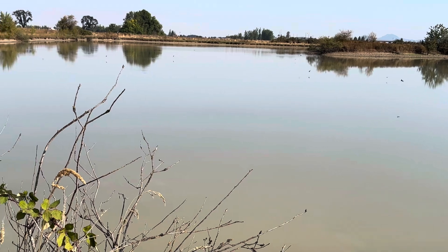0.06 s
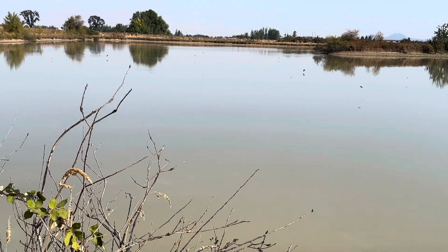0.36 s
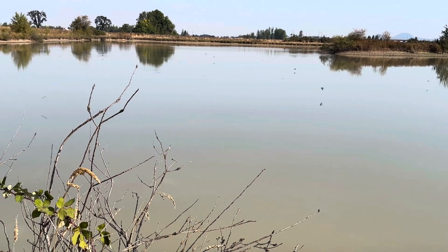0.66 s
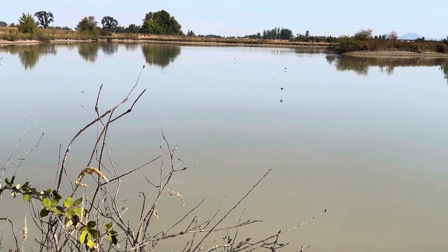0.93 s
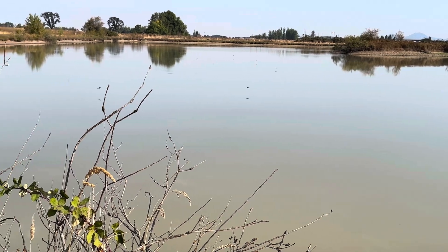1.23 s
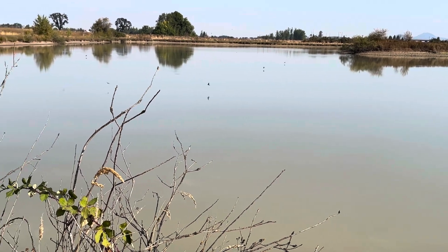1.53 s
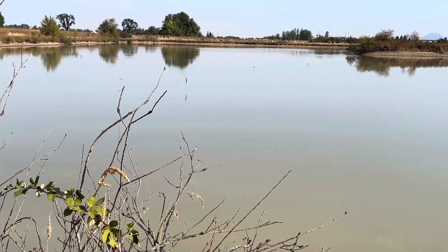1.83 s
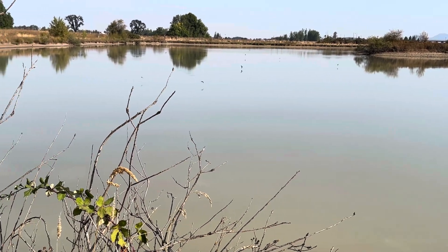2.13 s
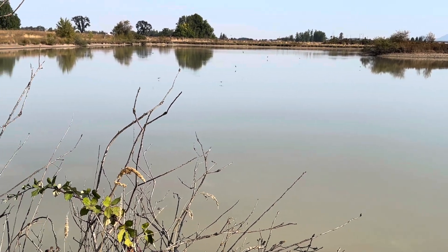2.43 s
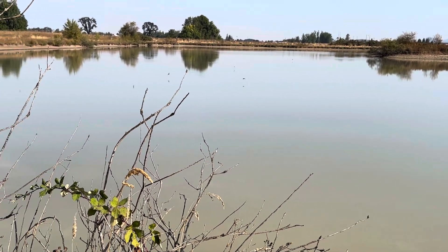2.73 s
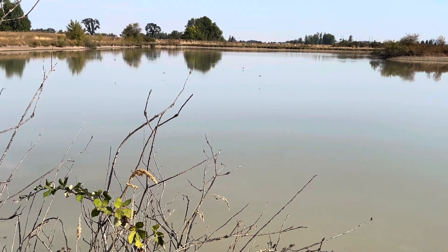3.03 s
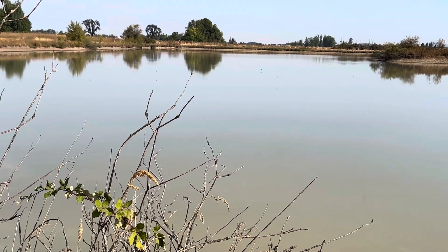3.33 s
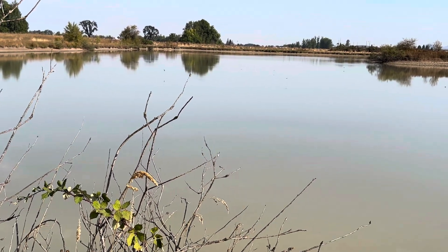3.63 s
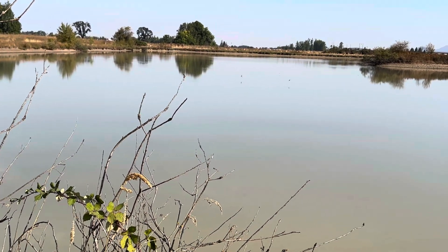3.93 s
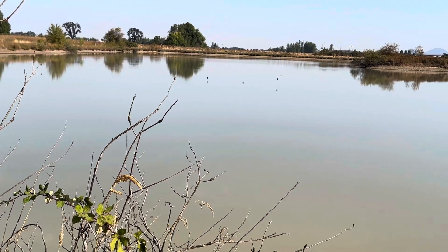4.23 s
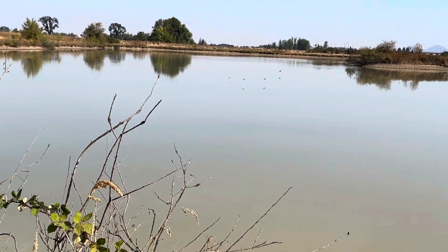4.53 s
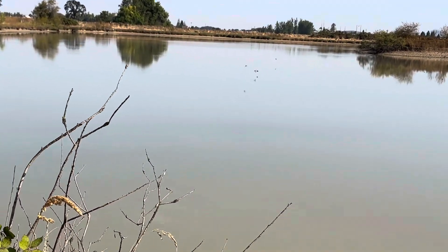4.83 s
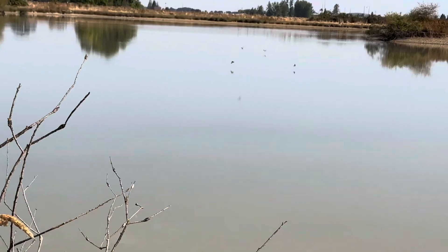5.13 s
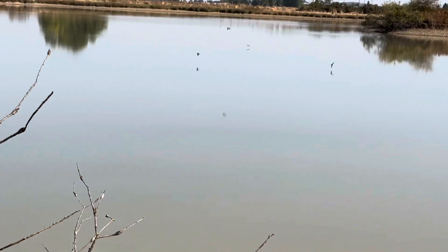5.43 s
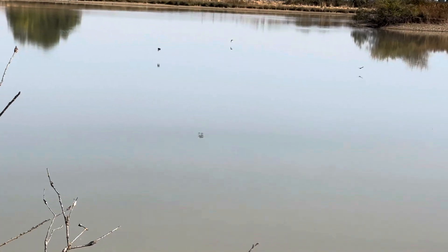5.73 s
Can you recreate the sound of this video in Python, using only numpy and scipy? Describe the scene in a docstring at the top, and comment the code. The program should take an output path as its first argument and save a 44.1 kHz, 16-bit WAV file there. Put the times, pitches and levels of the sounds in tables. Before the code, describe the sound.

Low wind rumbles and bumps the microphone while small birds call outdoors with quick high pips and thin, sliding whistles.

```python
"""Small birds call across a pond: one pips about ten times a second, others slur high, wavering
whistles over it. Each note is a gliding three-partial tone roughened by flutter; the banks echo the
calls and reeds smear them. Below lie wind rumble, a drone, a faint hum and a distant hush of shaped
noise; eddies thump the microphone. One sharp tick and one short rasp sound close by."""
import sys
import numpy as np
from scipy import signal
from scipy.fft import rfft, irfft, next_fast_len
from scipy.io import wavfile
from scipy.ndimage import uniform_filter1d, map_coordinates

SR = 44100
rng = np.random.default_rng(int(sys.argv[2]) if len(sys.argv) > 2 else 0)


def wav_record(signal):
    """Record a signal, one row per channel, as 16-bit PCM in the file named by sys.argv[1]."""
    frames = np.transpose(np.atleast_2d(signal))
    bounded = np.clip(frames, -1, 1)
    # unit amplitude maps onto the largest positive 16-bit level
    quanta = np.round(bounded * 32767).astype(np.int16)
    wavfile.write(sys.argv[1], SR, quanta)


N = 258867

# Air level contours: t/s, rumble/dB, hush/dB
AIR_LEVELS = [(0.0, -41.5, -61.5), (0.65, -45, -61), (1.99, -47.5, -62), (4.5, -47, -62.5),
              (4.87, -48.5, -62), (5.23, -47, -61.5), (5.66, -52, -61.5), (5.87, -43, -60)]
# Eddies at the microphone: peak t/s, half width/s, f/Hz, push/dB, buffet/dB
EDDIES = [(0.037, 0.028, 60.67, -31.5, -76), (0.448, 0.0086, 80, -29, -72),
          (0.518, 0.0083, 80.2, -34.5, -66), (0.832, 0.019, 90.9, -35.5, -74), (0.898, 0.019, 62, -29, -67),
          (1.027, 0.013, 82.4, -36, -71), (4.53, 0.023, 87.9, -29.5, -49.5),
          (5.171, 0.0084, 75.6, -20, -42), (5.297, 0.012, 86.6, -27.5, -52),
          (5.362, 0.02, 106.3, -31.5, -48.5), (5.429, 0.019, 63.5, -27, -55),
          (5.704, 0.0083, 69.4, -37, -54.5), (5.774, 0.02, 65, -36.5, -46),
          (5.81, 0.0094, 85.9, -32.5, -58), (5.86, 0.019, 69.7, -32.5, -47)]
# Noise spectra: f/Hz, relative density/dB
RUMBLE_SPECTRUM = [(13, -40), (22, -19.5), (48, -1), (98, 0), (111, -4), (129, -7.5), (146, -8.5),
                   (243, -28.5), (400, -44.5), (520, -58.5), (880, -120)]
BUFFET_SPECTRUM = [(40, -24), (100, -5.5), (180, 8.5), (280, -3.5), (400, -18.5), (700, -61), (1500, -120)]
HUSH_SPECTRUM = [(120, -19), (280, 2), (500, 1.5), (575, 4.5), (660, 3.5), (1050, 1), (1400, -6.5),
                 (1900, -13), (2600, -19), (4000, -24), (5200, -34.5), (7200, -36), (9000, -38.5),
                 (14000, -50)]
HAZE_SPECTRUM = [(2000, -30), (3200, -6), (4000, -1), (5000, -10), (6200, -4.5), (7500, -25)]
RASP_SPECTRUM = [(2000, -64), (4500, -6), (5700, -6), (6500, 3.5), (7400, 0), (8800, -18), (12000, -41)]
# Left-right likeness of the noise: f/Hz, coherence/1
COHERENCE = [(50, 0.96), (150, 0.95), (280, 0.89), (500, 0.83), (1000, 0.56), (2000, 1), (4000, 0.94),
             (9000, 0.21)]
# Left-right phase offset of the noise: f/Hz, left phase lead/rad
LEFT_LEAD = [(200, 0), (340, -0.17), (560, -1.46), (780, -1.8), (1290, -1.62), (2000, -0.22)]
# Far sinking notes: t/s, length/s, mid f/Hz, level/dB
ANSWER_NOTES = [(.005, 0.028, 3730, -66), (0.042, .032, 3720, -72), (0.236, .035, 3490, -76),
                (0.347, .045, 3650, -75), (1.362, 0.019, 3640, -61.5), (1.59, 0.028, 3610, -69),
                (2.185, 0.024, 3520, -74), (2.3, 0.038, 3700, -69), (2.543, 0.033, 3420, -69),
                (2.562, 0.046, 3690, -70.5), (2.634, .03, 3370, -72), (2.743, .03, 3480, -73),
                (2.906, 0.046, 3470, -73.5), (3.071, 0.044, 3510, -74), (3.146, 0.083, 3590, -74),
                (3.233, 0.031, 3440, -72), (3.569, 0.048, 3875, -68), (3.969, 0.035, 3880, -70),
                (3.993, .025, 3430, -71), (4.007, .06, 3700, -77), (4.141, 0.02, 3970, -66),
                (4.131, 0.043, 3370, -75), (4.24, 0.036, 3680, -69), (4.295, 0.039, 3360, -73),
                (4.624, 0.045, 3510, -75), (4.777, 0.035, 3650, -71), (4.825, 0.044, 3580, -74.5),
                (4.913, .026, 3280, -72), (5.064, 0.046, 3550, -72), (5.097, 0.04, 3440, -73.5),
                (5.308, 0.08, 3500, -73.5), (5.399, 0.034, 3670, -74), (5.475, 0.035, 3400, -73),
                (5.502, 0.059, 3520, -70), (5.572, 0.038, 3350, -72), (5.69, 0.042, 3810, -71),
                (5.692, .04, 3530, -72.5), (5.711, 0.045, 3430, -70)]
# Pips in four runs: t/s, length/s, f/Hz, level/dB
PIP_NOTES = [(0.036, 0.021, 3825, -57.5), (0.124, 0.029, 3795, -61.5), (0.209, 0.024, 3780, -60),
             (0.299, 0.017, 3805, -56.5), (0.388, 0.024, 3790, -60), (0.479, 0.028, 3760, -61),
             (0.566, 0.027, 3780, -60), (1.076, 0.03, 3840, -59), (1.287, 0.021, 3870, -59),
             (1.374, 0.033, 3890, -59.5), (1.467, 0.03, 3865, -58.5), (1.567, 0.029, 3955, -55),
             (1.663, 0.04, 3940, -59.5), (1.762, 0.03, 3870, -58.5), (1.857, 0.027, 3830, -63),
             (1.95, 0.022, 3890, -59), (2.041, 0.028, 3900, -62.5), (2.13, 0.038, 3907, -62),
             (2.227, 0.026, 3950, -61.5), (2.325, 0.031, 3880, -62), (2.422, 0.016, 3823, -56.5),
             (2.519, 0.025, 3920, -63.5), (2.613, 0.036, 3960, -61), (3.214, 0.03, 3870, -60),
             (3.302, 0.028, 3790, -64), (3.393, 0.021, 3690, -67), (3.482, 0.027, 3800, -62),
             (3.571, 0.023, 3770, -67), (3.663, 0.024, 3800, -60.5), (3.749, 0.031, 3804, -62.5),
             (3.838, 0.025, 3840, -62.5), (3.932, 0.023, 3840, -62.0), (4.026, 0.021, 3820, -60.5),
             (4.115, 0.033, 3840, -59.5), (4.615, 0.023, 3835, -61.5), (4.724, 0.016, 3860, -60),
             (4.82, 0.029, 3907, -58.5), (4.911, 0.027, 3880, -58), (5.005, 0.028, 3910, -56.5),
             (5.093, 0.034, 3890, -59.5), (5.188, 0.024, 3875, -56.5), (5.282, 0.03, 3890, -57),
             (5.377, 0.02, 3860, -58.5), (5.464, 0.018, 3855, -60.5), (5.553, 0.021, 3830, -63),
             (5.642, 0.021, 3850, -61.5), (5.729, 0.021, 3820, -61.5), (5.821, 0.022, 3800, -62)]
# Slurs: t/s, length/s, nominal crest f/Hz, knee f/Hz, mid-tail f/Hz, end f/Hz, crest/dB, tail/dB
SLUR_NOTES = [(.086, .135, 4250, 3800, 3610, 3520, -64.5, -68),
              (0.423, .44, 4530, 3810, 4120, 3960, -62.5, -65.5),
              (0.488, .16, 4850, 4390, 4340, 4240, -70, -72),
              (0.629, .145, 4290, 3820, 3650, 3570, -62, -65.5),
              (1.121, 0.12, 4850, 4470, 4390, 4370, -72, -68),
              (1.159, .15, 4300, 3780, 3610, 3580, -58.5, -66),
              (1.515, .27, 4450, 3966, 4046, 3794, -64, -65),
              (1.858, .155, 4350, 3800, 3670, 3540, -59.5, -64.5),
              (2.382, .14, 4350, 3810, 3660, 3560, -62, -66),
              (2.983, .145, 4300, 3760, 3600, 3480, -63.5, -67.5),
              (3.28, .4, 4540, 3870, 4185, 3970, -69, -65), (5.087, .31, 4740, 3984, 4154, 3910, -62, -66)]
# Arched chirps: t/s, length/s, mid f/Hz, glide/share of f, level/dB
CHIRP_NOTES = [(.37, .055, 4300, .035, -78), (0.885, 0.042, 4160, -0.097, -66),
               (1.33, 0.045, 5310, 0.15, -71.5), (2.273, .085, 4330, .03, -79),
               (2.773, 0.045, 4380, -0.028, -75.5), (2.938, .05, 4370, 0.043, -78),
               (3.059, 0.036, 4980, -0.068, -77), (3.156, .028, 5080, -0.01, -77),
               (3.109, 0.035, 3950, 0.053, -61), (3.292, 0.058, 7100, 0.085, -74),
               (3.298, 0.069, 5440, 0.12, -74), (3.837, 0.16, 4240, -0.081, -71),
               (5.436, 0.088, 8840, -0.17, -80), (5.459, 0.054, 7740, -0.0012, -74),
               (5.831, 0.043, 3980, -0.1, -65)]
# Nearest bird's call, one point list per note: delay/s, f/Hz, relative level/dB
PHRASE_SHAPE = [
    [(0, 3914, -2), (.02, 3970, 2), (.046, 4290, 0), (.06, 4240, -6), (.072, 4060, -4.5)],
    [(.103, 4120, 0), (.118, 4320, 2), (.136, 4240, -5.5), (.146, 4220, -8.5), (.16, 4250, 0),
     (.19, 4176, 2.5), (.208, 4010, -2), (.224, 3820, -9)],
]
# Repeats of that call: t/s, level/dB
PHRASE_CALLS = [(.656, -57), (2.713, -59.5), (4.217, -59)]
# Falling chips: t/s, length/s, start f/Hz, fall/share of f, level/dB, relative overtone/dB
CHIP_NOTES = [(1.013, 0.048, 3050, 0.13, -75, -7.5), (1.154, 0.036, 3370, 0.33, -72.5, -20),
              (1.316, 0.029, 3370, 0.36, -72.5, -16), (1.8, 0.049, 3100, 0.22, -76.5, -7),
              (2.102, 0.05, 3050, 0.29, -76, -18), (2.217, 0.073, 2630, 0.3, -83, 4),
              (5.044, 0.022, 3100, 0.11, -77, -19), (5.092, 0.033, 2400, 0.056, -73.5, -26.5),
              (5.142, 0.027, 3220, 0.09, -70, -16)]
# Shore echo decay: f/Hz, t60/s
SHORE_T60 = [(500, .16), (4000, .18), (10000, .05)]


def amp(db):
    """Decibels to gain."""
    return 10 ** (np.asarray(db) / 20)


def unit(x):
    """Scale to rms 1."""
    return x / np.sqrt(np.mean(x ** 2) + 1e-20)


def clock(length_s):
    """Sample times in s."""
    return np.arange(int(length_s * SR)) / SR


def along(points, hz):
    """Read (f/Hz, value) points on a log axis."""
    f, values = np.transpose(points)
    return np.interp(np.log(hz + 1), np.log(f + 1), values)


def glide(t, times, values):
    """Path through points, corners rounded."""
    return uniform_filter1d(np.interp(t, times, values), size=400, mode="nearest")


def wobble(rate_hz, size=N):
    """Smooth random curve with knots at rate_hz."""
    knots = rng.standard_normal(int(size * rate_hz / SR) + 4)
    return map_coordinates(knots, [np.arange(size) * rate_hz / SR])


def filtered(x, response):
    """Apply a frequency response."""
    size = next_fast_len(N + SR // 2)
    return irfft(rfft(x, size) * response(np.fft.rfftfreq(size, 1 / SR)), size)[..., :N]


def add(track, start_s, sound):
    """Mix a sound into a track."""
    part = track[max(round(start_s * SR), 0):][:len(sound)]
    part += sound[:len(part)]


def from_the_side(x, lead_us=20, pan_db=0.15):
    """Off-axis sound reaches the left port earlier and louder."""
    sides = np.array([[1], [-1]])
    return amp(pan_db * sides) * filtered(x, lambda hz: np.exp(1j * np.pi * hz * sides * lead_us / 1e6))


def rush(spectrum, patchy_db):
    """Partly coherent stereo noise, rms 1, with drifting patches of gain."""
    def mid_side_gains(hz):
        angle = np.arccos(np.clip(along(COHERENCE, hz), -1, 1)) / 2
        return amp(along(spectrum, hz)) * [np.cos(angle), np.sin(angle)]

    bins = signal.stft(rng.standard_normal((2, N)), nperseg=512)[2]
    patches = uniform_filter1d(rng.standard_normal(bins.shape[1:]), size=5, axis=0)
    patches = unit(uniform_filter1d(patches, size=16, axis=1))
    pair = signal.istft(bins * amp(patchy_db * patches), nperseg=512)[1][:, :N]
    mid, side = filtered(pair, mid_side_gains)
    stereo = np.array([mid + side, mid - side])
    return unit(filtered(stereo, lambda hz: np.exp(.5j * along(LEFT_LEAD, hz) * [[1], [-1]])))


def note(t, hz, attack_s, release_s, waver, under_db, over_db, rough, flutter_db=2.15):
    """Bird tone: the throat favours partial 2, at hz; under_db and over_db set partials 1 and 3."""
    jitter, flutter, grain = (wobble(rate_hz, SR // 2)[:len(t)] for rate_hz in (250, 130, 1500))
    phase = np.pi * np.cumsum(hz * (1 + waver * jitter)) / SR
    onset = np.sin(np.pi / 2 * np.clip(t / attack_s, 0, 1))
    fade = np.sin(np.pi / 2 * np.clip((t[-1] - t) / release_s, 0, 1)) ** 2
    tone = np.sin(2 * phase) + amp(under_db) * np.sin(phase) + amp(over_db) * np.sin(3 * phase)
    return onset * fade * amp(flutter_db * flutter) * (1 + rough * grain) * tone


def air(drone_hz=99, hum_hz=565, hum_width_hz=32, buffet_lead_s=.0021, buffet_spread=1.49):
    """Wind rumble, buffeting that leads and outlasts each puff, far drone and hum, open-land hush."""
    t = np.arange(N) / SR
    times, *levels = np.transpose(AIR_LEVELS)
    rumble_db, hush_db = (np.interp(t, times, level) for level in levels)
    flares = sum(amp(db) * np.exp(-((t + buffet_lead_s - peak_s) / (buffet_spread * width_s)) ** 2)
                 for peak_s, width_s, _, _, db in EDDIES)
    rumble = amp(rumble_db + 0.57 + 0.97 * wobble(6.5)) * rush(RUMBLE_SPECTRUM, patchy_db=1)
    buffet = (amp(rumble_db - 18) + flares) * amp(1.8 * wobble(25)) * rush(BUFFET_SPECTRUM, patchy_db=2.5)
    hush = amp(hush_db + 3) * rush(HUSH_SPECTRUM, patchy_db=0.87)
    drone_gain = amp(-48.5 + 0.64 * wobble(7.4))
    drone = drone_gain * np.sin(2 * np.pi * np.cumsum(drone_hz + 2.54 * wobble(14)) / SR)
    hum = filtered(rng.standard_normal(N), lambda hz: np.exp(-((hz - hum_hz) / hum_width_hz) ** 2))
    return from_the_side(rumble + drone + amp(-72) * unit(hum), lead_us=23, pan_db=0.52) + buffet + hush


def puffs(port_skew_rad=0.2, slowing=0.3867):
    """Each eddy pushes the microphone for a few slowing cycles, the two ports slightly out of step."""
    out, t = np.zeros((2, N)), np.arange(N) / SR
    for peak_s, width_s, hz, db, _ in EDDIES:
        u = np.arange(-7 * width_s, 7 * width_s, 1 / SR) / width_s
        phase = 2 * np.pi * (np.cumsum(hz * (1 - slowing * np.tanh(u))) / SR + rng.random())
        for port, skew in zip(out, port_skew_rad * rng.standard_normal(2)):
            push = amp(db) * np.sin(phase + skew) / np.cosh(1.27 * u)
            port += np.interp(t, peak_s + u * width_s, push, left=0, right=0)
    return out


def answers(sink_per_s=.7):
    """The flock answers from farther off: thin, lower, steadily sinking notes."""
    out = np.zeros(N)
    for start_s, length_s, hz, db in ANSWER_NOTES:
        t = clock(length_s)
        pitch_hz = hz * (1 - sink_per_s * (t - length_s / 2))
        tone = note(t, pitch_hz, attack_s=.008, release_s=.014, waver=.008,
                    under_db=-15, over_db=-30, rough=.18)
        add(out, start_s, amp(db) * tone)
    return out


def shore_echo(calls):
    """The banks scatter the calls into a thin tail that changes as the birds move."""
    out, t = np.zeros((2, N)), np.arange(N) / SR
    centres_s, step_s = np.linspace(0, N / SR, num=12, retstep=True)
    for centre_s in centres_s:
        hz, age_s, bins = signal.stft(rng.standard_normal((2, SR // 3)), SR, nperseg=256)
        decay = amp(-60 * age_s / along(SHORE_T60, hz)[:, None])
        tail = signal.istft(bins * decay, SR, nperseg=256)[1]
        crossfade = np.clip(1 - abs(t - centre_s) / step_s, 0, 1)
        out += signal.oaconvolve((calls * crossfade)[None], tail / np.linalg.norm(tail[0]), axes=1)[:, :N]
    return out


def haze(calls, db=-24, lag_s=.028):
    """Reeds and twigs smear a faint, grainy halo that trails the calls."""
    envelope = np.sqrt(np.abs(uniform_filter1d(calls ** 2, size=2600)))
    lagged = np.interp(np.arange(N) - lag_s * SR, np.arange(N), envelope)
    return amp(db) * lagged * rush(HAZE_SPECTRUM, patchy_db=7)


def pips(arch=.004, tilt=.004, trail_s=.0053):
    """Short pips, each with a slight random arch and tilt in pitch."""
    out = np.zeros(N)
    for start_s, length_s, hz, db in PIP_NOTES:
        t = clock(length_s + trail_s)
        bow = arch * (1 + rng.standard_normal() / 2)
        rise = tilt * rng.standard_normal()
        pitch_hz = hz * glide(t, [0, t[-1] / 2, t[-1]], [1 - bow - rise, 1 + bow / 2, 1 - bow + rise])
        tone = note(t, pitch_hz, attack_s=.0023, release_s=.019, waver=.0032,
                    under_db=-14.5, over_db=-31, rough=.038, flutter_db=1.5)
        add(out, start_s - .001, amp(db) * tone)
    return out


def bank_slap(calls, delay_s=.031, db=-17.5):
    """The near bank returns each call once."""
    return amp(db) * filtered(calls, lambda hz: np.exp(-2j * np.pi * hz * delay_s))


def far_twitter(count=44, low_hz=3400, range_hz=2500, base_db=-85, fall=.07, high_loss_db=7):
    """Faint, hoarse falling notes from the far water; higher ones carry less well."""
    out = np.zeros(N)
    for slot, (offset, span, height, loudness) in enumerate(rng.random((count, 4))):
        t = clock(.033 + .05 * span)
        pitch_hz = (low_hz + range_hz * height) * (1 - fall * t / t[-1])
        level_db = base_db + 5 * loudness - high_loss_db * height
        tone = note(t, pitch_hz, attack_s=.008, release_s=.012, waver=.025,
                    under_db=-12.5, over_db=-28, rough=1)
        add(out, (slot + offset) / count * N / SR, amp(level_db) * tone)
    return out


def slurs(crest_s=.012, knee_s=.044, fade_db=-7):
    """Whistles flick up to a crest, drop to a knee and trail off in one bow."""
    out = np.zeros(N)
    for start_s, length_s, crest_hz, knee_hz, mid_hz, end_hz, crest_db, tail_db in SLUR_NOTES:
        t = clock(length_s)
        tail_share = np.clip((t - knee_s) / (length_s - knee_s), 0, 1)
        bow_hz = (mid_hz - (knee_hz + end_hz) / 2) * np.sin(np.pi * tail_share)
        pitch_hz = bow_hz + glide(t, [0, crest_s, knee_s, length_s],
                                  [.97 * crest_hz, 1.02 * crest_hz, knee_hz, end_hz])
        knee_db = crest_db - 18 * length_s  # the bird eases off before a long tail
        level_db = glide(t, [0, crest_s, knee_s, (knee_s + length_s) / 2, length_s],
                         [crest_db, crest_db, knee_db, tail_db, tail_db + fade_db])
        strain = np.interp(pitch_hz, [4200, 4800], [0, 1])
        tone = note(t, pitch_hz, attack_s=.0057, release_s=.022, waver=.002 + .004 * strain,
                    under_db=-11, over_db=-35.5, rough=.07 + .1 * strain, flutter_db=-.1)
        add(out, start_s, amp(level_db) * tone)
    return out


def chirps(arch=.031, hoarse_range_hz=(4400, 6500)):
    """Single chirps: one tilted pitch arch, raspier when pushed higher."""
    out, u = np.zeros(N), np.linspace(-1, 1, num=7)
    for start_s, length_s, hz, tilt, db in CHIRP_NOTES:
        t = clock(length_s)
        knots_hz = hz * (1 + tilt * u / 2 - arch * u ** 2)
        pitch_hz = glide(t, np.linspace(0, length_s, len(u)), knots_hz)
        strain = np.interp(np.mean(knots_hz), hoarse_range_hz, [0, 1])
        tone = note(t, pitch_hz, attack_s=.26 * length_s, release_s=.28 * length_s,
                    waver=.005 + .011 * strain, under_db=-15.5, over_db=-31, rough=.1 + .35 * strain)
        add(out, start_s, amp(db) * tone)
    return out


def phrases():
    """The nearest bird's call: a rising note, then a long arch that falters once and falls."""
    out = np.zeros(N)
    for start_s, db in PHRASE_CALLS:
        for points in PHRASE_SHAPE:
            delays_s, knots_hz, knots_db = np.transpose(points)
            t = clock(delays_s[-1] - delays_s[0])
            pitch_hz = glide(t + delays_s[0], delays_s, knots_hz)
            level_db = db + glide(t + delays_s[0], delays_s, knots_db)
            tone = note(t, pitch_hz, attack_s=.004, release_s=.009, waver=.003,
                        under_db=-14.5, over_db=-30.5, rough=.083, flutter_db=1.4)
            add(out, start_s + delays_s[0], amp(level_db) * tone)
    return out


def chips():
    """Thin chips falling ever faster; in most, partial 1 is strongest."""
    out = np.zeros(N)
    for start_s, length_s, hz, fall, db, overtone_db in CHIP_NOTES:
        t = clock(length_s)
        overtone_hz = 2 * hz * (1 - fall * (t / length_s) ** 1.3)
        tone = note(t, overtone_hz, attack_s=.0046, release_s=.0033, waver=.01,
                    under_db=-overtone_db, over_db=-26.5, rough=.27)
        add(out, start_s, amp(db + overtone_db) * tone)
    return out


def tick(at_s=3.4897, crack_hz=2100, knock_hz=760, knock_fall_s=.0045, knock_t60_s=.055):
    """Dry tick: brief scrape, one-cycle crack, bright snap and a dead knock that drops in pitch."""
    out, t = np.zeros(N), clock(.05)
    scrape = amp(-63 - 60 * t / .15) * rng.standard_normal(len(t))
    crack = amp(-38 - 60 * t / .0029) * np.cos(2 * np.pi * crack_hz * t)
    snap = amp(-42 - 60 * t / .0022) * rng.standard_normal(len(t))
    knock_cycles = knock_hz * knock_fall_s * (1 - np.exp(-t / knock_fall_s))
    knock = amp(-39 - 60 * t / knock_t60_s) * np.sin(2 * np.pi * knock_cycles)
    lowpass = signal.butter(4, knock_hz, fs=SR, output="sos")
    add(out, at_s - .005, scrape)
    add(out, at_s - .0004, snap + signal.sosfilt(lowpass, knock))
    add(out, at_s, crack)
    return filtered(out, lambda hz: amp(along([(7000, 0.5), (10000, -3), (14000, -6)], hz)))


def rasp(peak_s=3.792, rise_s=.052, fall_s=.028, db=-70.5):
    """Short, soft swell of high noise."""
    t = np.arange(N) / SR - peak_s
    swell = np.exp(-(t / np.where(t < 0, rise_s, fall_s)) ** 2)
    return amp(db) * swell * rush(RASP_SPECTRUM, patchy_db=1)


def scene():
    """Birds over the water, their echoes, wind and two small close sounds."""
    near = pips() + slurs() + phrases() + chirps()
    far = answers() + chips() + far_twitter()
    birds = from_the_side(near + far + bank_slap(near))
    echo = amp(-16) * shore_echo(near + 2 * far)
    return birds + echo + haze(near + far) + air() + puffs() + tick() + rasp()


def record(dry, notch_hz=8250, width_hz=480, notch_db=-18, bass_hz=30, top_hz=15500):
    """Microphone: narrow treble dip, deep-bass roll-off, hard band limit."""
    def response(hz):
        notch = amp(notch_db * np.exp(-((hz - notch_hz) / width_hz) ** 2))
        highpass = hz ** 2 / np.sqrt(hz ** 4 + bass_hz ** 4)
        return notch * highpass * (hz < top_hz)

    return filtered(dry, response)


dry = scene()
out = record(dry)
wav_record(out)
```